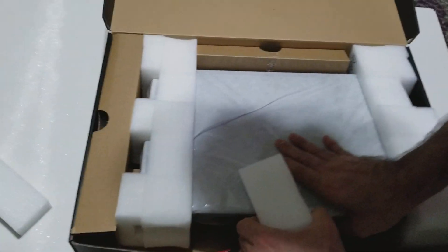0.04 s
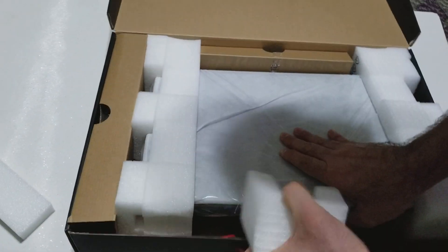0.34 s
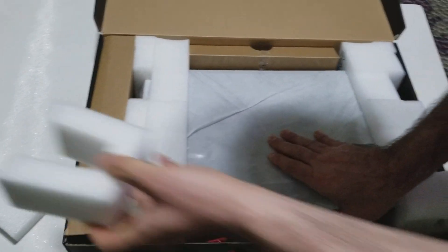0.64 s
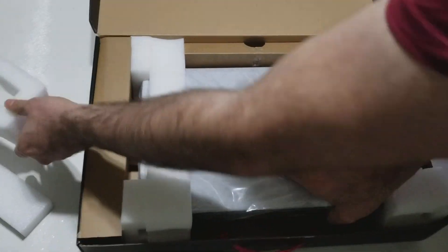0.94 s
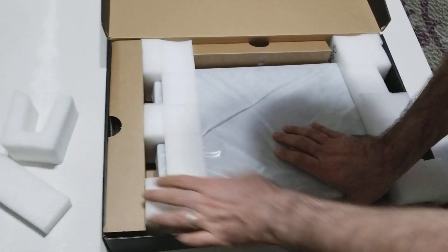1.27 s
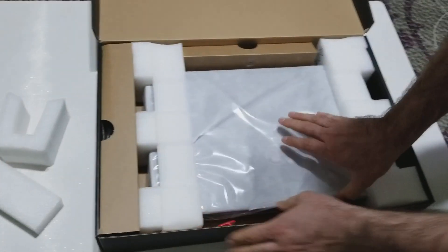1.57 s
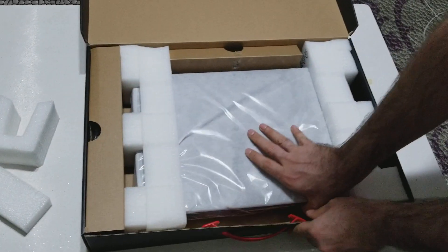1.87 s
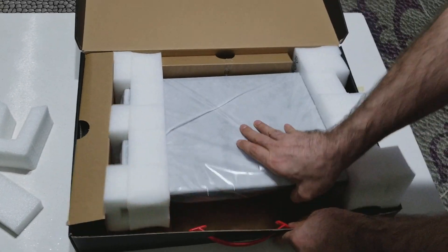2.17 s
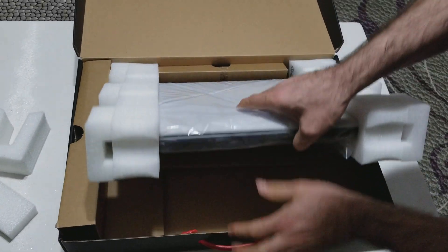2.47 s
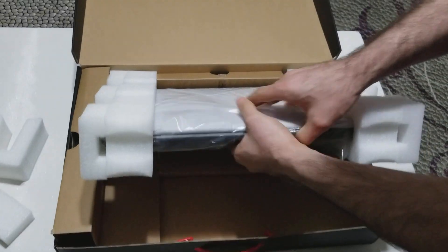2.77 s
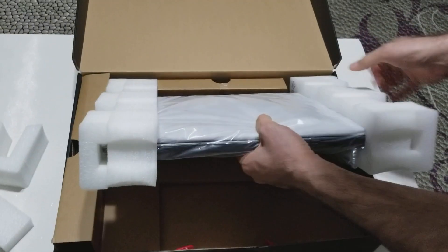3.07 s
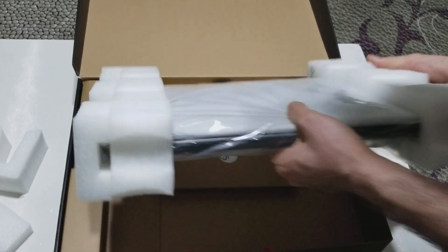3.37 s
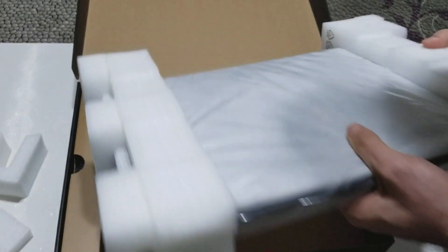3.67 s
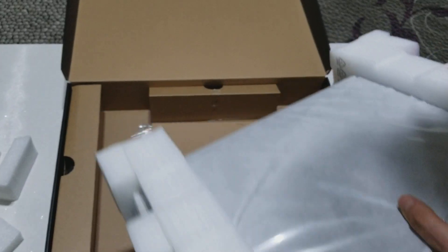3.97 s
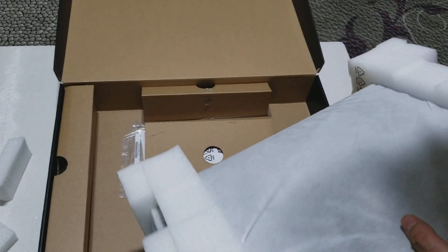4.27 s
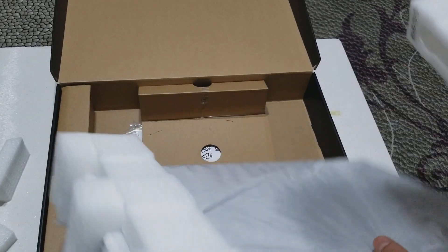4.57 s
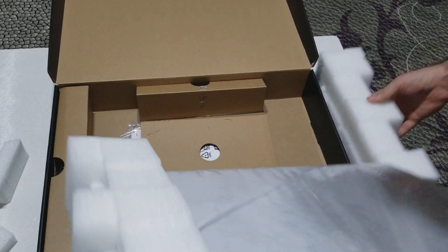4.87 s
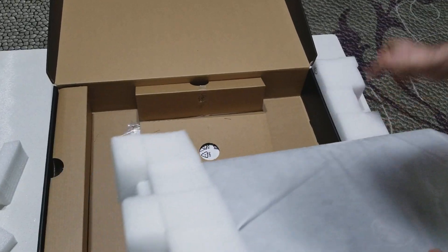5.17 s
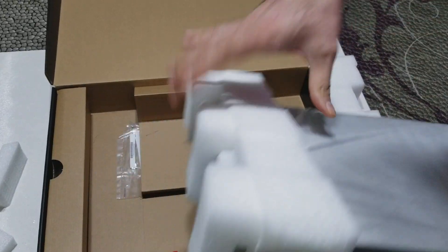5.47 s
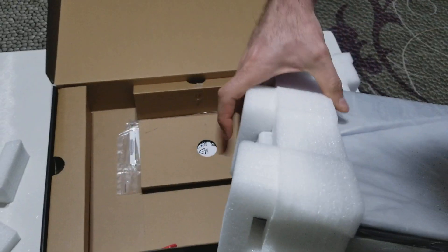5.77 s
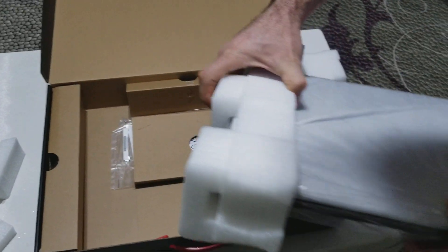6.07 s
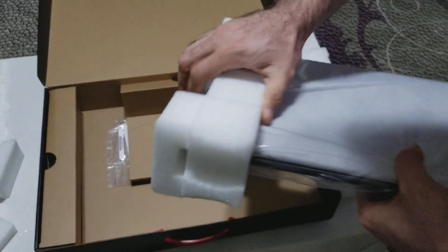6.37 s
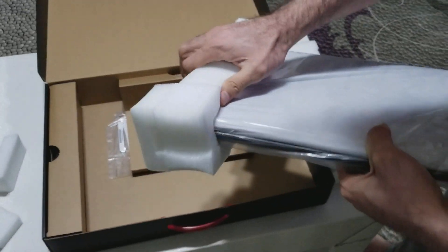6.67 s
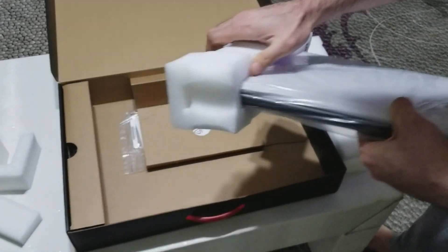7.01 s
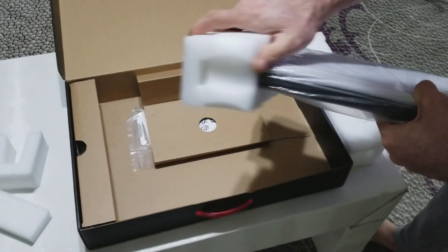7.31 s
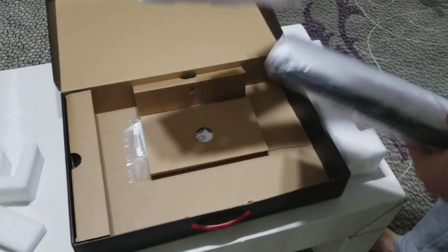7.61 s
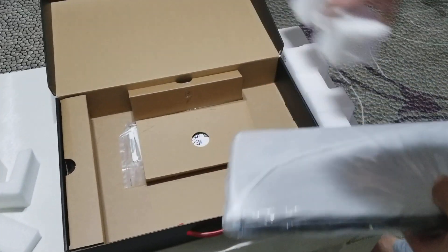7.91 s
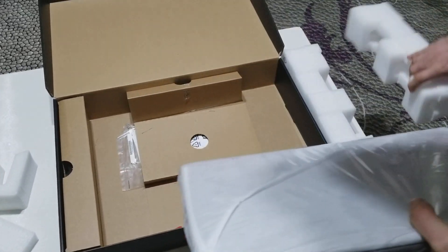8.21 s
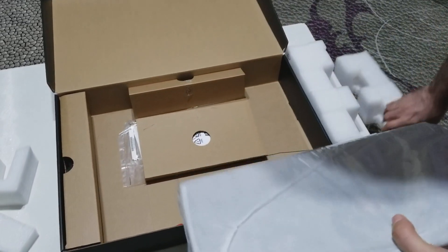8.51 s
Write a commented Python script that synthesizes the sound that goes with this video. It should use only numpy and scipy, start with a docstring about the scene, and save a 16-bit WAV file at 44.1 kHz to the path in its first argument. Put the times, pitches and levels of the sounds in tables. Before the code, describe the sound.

Foam packing rubs and rasps against a cardboard box while thin plastic wrap crinkles, with a few dull knocks.

```python
"""Foam rasps and thin plastic snaps: a sleeved laptop is lifted out of a cardboard box in a small room,
and its foam end caps are pulled off. Foam rubs on card and film in countless tiny slips, jerks free
and chafes with a hollow note. The sleeve crinkles as its creases buckle. The box drones under the
rubbing and thuds when knocked. Faint room noise and a low hum lie underneath."""
import sys
import numpy as np
from scipy import signal
from scipy.fft import rfft, irfft, next_fast_len
from scipy.io import wavfile
from scipy.ndimage import map_coordinates

SR = 44100
rng = np.random.default_rng(int(sys.argv[2]) if len(sys.argv) > 2 else 0)


def log_audio(samples):
    """Write samples as a 16-bit WAV file to the path given in sys.argv[1]."""
    # one column per channel
    frames = np.atleast_2d(samples).T
    # limit to full scale, then quantise
    limited = np.clip(frames, -1, 1)
    pcm = np.round(limited * 32767).astype(np.int16)
    wavfile.write(sys.argv[1], SR, pcm)


N = 381463
TIME_S = np.arange(N) / SR

# Foam strokes over card and film. Each row: start, build-up and slide in seconds, top rasp level in dB,
# then scrape, fizz and box drone in dB relative to the rasp.
STROKES = [(0.0, 0.005, 0.05, -44, -8, -18.5, -2.5), (0.091, 0.037, 0.086, -42, -7, -15, -9.5),
           (0.176, 0.018, 0.062, -38.0, -7, -8.0, -7.0), (0.292, 0.057, 0.0262, -35.5, -6.5, -7, -6.5),
           (0.505, 0.04, 0.0166, -48.5, -24, -5, -23.5), (0.822, 0.016, 0.015, -60, -19, -1, -16),
           (1.044, 0.0074, 0.032, -53.5, -10.5, -11, -1.5), (1.25, 0.047, 0.037, -54.5, 0, -13, 1.5),
           (1.298, 0.1081, 0.0214, -40.5, -3.5, -4.5, -8), (1.42, 0.032, 0.177, -51.5, -5.0, -13.5, -1.5),
           (1.693, 0.0545, 0.021, -53.5, -2, -26.5, 1.5), (1.812, 0.02, 0.084, -47.0, -2, -18, 1.0),
           (1.95, 0.072, 0.13, -46.5, -4.5, -1.5, -4.5), (2.132, 0.1545, 0.132, -39, -5, -8.0, -13.5),
           (2.399, 0.027, 0.1162, -47.5, 0.0, -15.5, 2.5), (2.679, 0.019, 0.095, -38.5, -8.5, -10.0, -9.5),
           (2.761, 0.0564, 0.0503, -38.0, -7, -17, -6.5), (2.976, 0.17, 0.055, -41, -4, -11.5, -12.5),
           (3.139, 0.12, 0.113, -37.8, -9.5, -8, -19), (3.513, 0.0243, 0.022, -57.5, -3.5, -7, 0),
           (3.733, 0.05, 0.094, -55.5, -7, -9, -8.5), (3.879, 0.055, 0.034, -51.5, -10, -11, -6.5),
           (4.059, 0.0497, 0.047, -49, -6.5, -7, -11.5), (4.196, 0.055, 0.125, -45.0, -11.5, -4, -11.5),
           (4.34, 0.031, 0.07, -37.5, -6, -1.5, -10), (4.454, 0.031, 0.072, -53.5, -4, -5.5, -5.5),
           (4.65, 0.1, 0.017, -46.5, -4.5, -9.5, -9.5), (4.943, 0.079, 0.026, -53, -3, -7.0, -4.0),
           (5.54, 0.025, 0.055, -40.5, -12.0, -9.5, -26), (5.672, 0.035, 0.018, -42, -10, -11.5, -21),
           (5.733, 0.035, 0.01, -41.5, -7.5, -11, -11), (5.815, 0.023, 0.047, -54, -8, -9, 0.5),
           (5.897, 0.018, 0.038, -45, -7.0, -9.5, -12.5), (6.168, 0.036, 0.038, -38.5, -11.5, -9, -19.5),
           (6.253, 0.055, 0.04, -38.0, -10.5, -8.5, -29), (6.422, 0.086, 0.1, -50.0, -5.5, -9.5, -8),
           (6.675, 0.031, 0.094, -60.5, -12.5, -7.0, -28), (6.991, 0.028, 0.026, -54, -2, -9.5, -18.5),
           (7.061, 0.089, 0.036, -44.0, -2.5, -14.5, -14), (7.141, 0.0599, 0.0321, -40.5, -5, -7.0, -17),
           (7.253, 0.055, 0.057, -51.5, -2, -4.5, -7), (7.339, 0.0464, 0.029, -38.0, -8.5, -6, -12.5),
           (7.424, 0.061, 0.13, -51.0, -4, -1.5, -19), (7.69, 0.091, 0.042, -59.5, -8, -9.0, -24),
           (7.928, 0.036, 0.0774, -65.0, -1.5, -5.5, -7.0), (8.467, 0.044, 0.075, -69.5, 0, -7, -2.5)]
# Light brushing as the load is carried. Each row: time in seconds, rasp level in dB.
HANDLING = [(0.0, -42.5), (0.4, -67), (0.75, -77), (0.99, -67.0), (1.24, -73), (1.54, -57.5), (2.58, -64.5),
            (2.96, -50), (3.62, -65), (4.03, -70.0), (4.6, -59.0), (5.27, -73.5), (5.43, -89), (5.95, -60),
            (6.83, -66), (7.55, -56.5), (8.15, -84.5), (8.65, -76.5)]
# Position of the rubbing. Each row: time in seconds, left over right in dB.
RUB_PAN = [(0, -1.5), (.6, -1.5), (1.35, -1), (1.8, -1), (2.3, -0.5), (2.8, -1), (3.3, 0), (3.9, -2),
           (4.4, -3), (5, -2), (6.3, 0.5), (7.3, -1), (8, -2), (8.65, -6.5)]
# Foam friction. Each row: frequency in Hz, relative density in dB.
FOAM_SPECTRUM = [(240, -25), (400, 0), (446, 1.5), (607, 3), (852, 1.5), (1090, 0), (2320, -7.5),
                 (2630, -5), (3210, -5.5), (5350, -6), (7870, -13), (8760, -17.5), (12500, -10),
                 (15000, -17), (16000, -28.5)]
# Shaken cardboard. Each row: frequency in Hz, relative density in dB.
CARD_SPECTRUM = [(90, -19), (122, -13.5), (144, -0.5), (165, -6.5), (200, -4), (255, -1.5), (320, -1),
                 (390, -3), (470, -7), (600, -9), (800, -38.5)]
# Room noise. Each row: frequency in Hz, relative density in dB.
AIR_SPECTRUM = [(15, -35.5), (25, -16.5), (53, -4.5), (74, -6.5), (102, -0.5), (127, -5), (249, -23),
                (560, -28), (796, -23.5), (1230, -35.5), (1370, -28), (1700, -32.5), (16000, -32.5)]
# Room hum. Each row: frequency in Hz, rms level in dB.
HUM_TONES = [(49, -88.5), (100, -83)]
# Big sleeve creases. Each row: time in seconds, level in dB, ring in Hz, left over right in dB.
BIG_CREASES = [(0.0196, -23, 3900, 2), (0.0286, -27.5, 3763, 8), (0.0358, -23.5, 4640, 2),
               (0.3, -32, 3740, -3), (0.364, -15, 7500, -2), (0.4472, -48, 7600, 5), (1.0564, -41, 7530, 6),
               (1.2539, -44, 5680, -2), (1.3166, -33, 4520, 2.5), (1.4432, -27, 5640, -3.5),
               (1.4996, -33.5, 4030, -2.5), (1.5358, -23, 3770, 1.5), (1.582, -27.5, 4420, -2.5),
               (1.589, -30, 4600, -10), (1.609, -26, 4460, -3), (1.7343, -39, 3900, -3),
               (1.8165, -24, 4640, -1.5), (1.8368, -26.5, 3100, 1), (1.9242, -31.5, 6530, 1.5),
               (2.0067, -28.5, 4980, -2.5), (2.0456, -22.5, 5600, -1.5), (2.1148, -28, 5140, -3.5),
               (2.6157, -33.5, 3900, -1.5), (2.662, -32, 4600, -5), (2.6941, -19.5, 4500, -1),
               (2.856, -17, 4530, 0.5), (2.871, -21, 5040, 0.5), (2.921, -22.5, 4746, -2),
               (3.707, -36.5, 4800, -7.5), (3.7408, -19, 5480, -4), (3.8422, -25.5, 3830, -4.5),
               (3.8939, -25, 5300, -5), (3.9258, -29.5, 5080, -2.5), (4.0652, -25.5, 4650, -8),
               (4.0775, -31, 6140, -5), (4.278, -27, 10800, -7.5), (4.4864, -27.5, 5000, -4),
               (4.5517, -29.5, 6190, -3), (4.6904, -28.5, 5530, 2), (4.7517, -28.5, 4530, -4.5),
               (4.9343, -41, 6020, -3), (5.0556, -33, 5100, -3), (5.1875, -44.5, 3800, -3),
               (5.2498, -43, 3600, -2.5), (5.8332, -27, 5490, -3), (6.127, -26.5, 3970, -8.5),
               (6.1437, -26.5, 4300, -3), (6.178, -29.5, 4840, -10), (6.491, -26, 7220, 2.5),
               (6.4965, -21.5, 3970, -4), (6.511, -26, 5270, -3), (6.519, -31.5, 3970, 0),
               (6.537, -28, 5900, -1.5), (6.6068, -37, 4860, 4.5), (6.7153, -27, 7700, 2.5),
               (6.7735, -30.5, 5170, -2.5), (6.875, -31, 6920, -3), (7.0057, -32.5, 4740, -2.5),
               (7.1062, -29.5, 3700, -2), (7.3853, -17, 3630, -3), (7.5142, -29.5, 4850, -2.5),
               (7.5794, -24.5, 5620, -3), (7.7722, -29, 5970, -2.5), (7.8945, -37.5, 5700, -7.5),
               (7.944, -31, 5240, -6.5), (8.0393, -36.5, 4950, -8)]
# Blows on the box. Each row: time in seconds, level in dB, excitation centre in Hz, spread in octaves.
KNOCKS = [(0.196, -35.5, 298, 0.7), (0.341, -30.5, 292, 0.3), (0.362, -30, 260, 0.96),
          (1.052, -38, 185, .45), (1.079, -30, 185, 0.5), (1.258, -34.5, 183, 0.735),
          (1.287, -39, 178.5, 0.3), (1.42, -25.5, 500, 0.804), (1.424, -36, 70, 0.53),
          (1.437, -24, 150, 1.5), (1.463, -33.5, 330, 1.11), (1.581, -41.5, 307, 0.42),
          (1.828, -37, 304, 0.384), (2.111, -36.5, 313, 0.63), (2.433, -31, 237.5, 0.461),
          (2.749, -29, 248, 0.17), (2.810, -33, 372, 0.21), (2.842, -31, 271, 0.31),
          (3.155, -14, 473, 0.607), (3.180, -24, 386, 0.3), (3.384, -22.5, 260, 0.862),
          (3.401, -31.5, 152, 0.33), (4.385, -50, 88, .25), (4.96, -52, 200, 1.2), (5.016, -39, 97, 0.29),
          (5.018, -35, 280, .75), (6.922, -50, 213, 0.21), (7.377, -41, 105, 0.7), (7.557, -43.5, 800, .7),
          (8.545, -58.5, 150, 0.22)]
# Box resonances. Each row: frequency in Hz, relative level in dB, T60 in seconds.
BOX_MODES = [(68, -12.5, 0.11), (102, -17.5, 0.033), (144.2, -2, 0.46), (179.7, -4.5, 0.25),
             (235.6, -9.5, .25), (264, -1, 0.19), (319, -3.5, .1), (370.4, -5, 0.18), (391, -10, 0.25),
             (477.5, 0, 0.055), (604, 1.5, 0.064), (758, 7, 0.03), (890, -18.5, 0.029), (1063, -4, 0.12),
             (1400, -8, 0.049)]
# Short noisy bursts: foam jerking free, a burst of sleeve crinkle (1.858 s) and a light tap (7.558 s).
# Each row: peak time in seconds, level in dB, rise and fall in seconds, pitch in Hz.
BURSTS = [(0.363, -24, 0.0012, 0.003, 4570), (0.369, -30.5, 0.0017, 0.0027, 1100),
          (1.318, -33, 0.00066, 0.0015, 1900), (1.858, -39.5, 0.0072, 0.0055, 3600),
          (2.692, -41, 0.0017, 0.0043, 4300), (4.355, -28, 0.00061, 0.0056, 5640),
          (4.364, -31, 0.0027, 0.0057, 2240), (5.908, -36.5, 0.00058, 0.00607, 2800),
          (5.912, -29.5, 0.00161, 0.0048, 3200), (7.38, -37, 0.0077, 0.0044, 1250),
          (7.382, -31, 0.0078, 0.0034, 3600), (7.558, -38, .0006, 0.0035, 1000)]
# Hollow foam chafes. Each row: peak time in seconds, level in dB, swell sigma in seconds, pitch in Hz.
CHAFES = [(0.546, -60, 0.021, 1412), (0.648, -64, .008, 1600), (0.985, -69.5, 0.042, 467),
          (4.106, -55.5, 0.0057, 1560), (4.389, -39, 0.01, 335), (4.707, -55, 0.0102, 973),
          (4.798, -54, 0.007, 1205), (6.206, -45.5, 0.0129, 1137), (7.033, -57.5, 0.0076, 726),
          (7.115, -49.5, .005, 520), (7.174, -49.5, 0.0055, 700), (7.274, -46.5, 0.0049, 695),
          (7.376, -38, 0.0141, 1640), (8.447, -68.5, 0.03, 620), (8.521, -58.5, 0.015, 627),
          (8.561, -65.5, 0.02, 929)]
# Sleeve flexes. Each row: start in seconds, length in seconds, mean snap level in dB.
FLEXES = [(1.487, .15, -35.5), (1.83, .3, -34.5), (3.552, .11, -46), (3.76, .08, -42), (3.921, .07, -38),
          (4.08, .05, -35), (4.499, .25, -39.5), (6.52, .14, -34), (7.02, .08, -37.5), (7.583, .17, -45)]
# Reverberation. Each row: frequency in Hz, T60 in seconds.
ROOM_T60 = [(150, 0.34), (1000, 0.35), (5000, 0.13), (15000, 0.14)]


def from_db(db):
    return 10 ** (np.asarray(db) / 20)


def unit_rms(x):
    return x / np.sqrt(np.mean(x ** 2) + 1e-20)


def over_time(points):
    """Read a curve at every sample."""
    return np.interp(TIME_S, *np.transpose(points))


def at_hz(points, hz):
    """Read a curve on a log-frequency axis."""
    points_hz, values = np.transpose(points)
    return np.interp(np.log(hz), np.log(points_hz), values)


def coloured(x, spectrum):
    """Give noise a spectrum; rms 1."""
    size = next_fast_len(N)
    hz = np.maximum(np.arange(size // 2 + 1) * SR / size, 1)
    return unit_rms(irfft(rfft(x, size) * from_db(at_hz(spectrum, hz)), size)[..., :N])


def band(x, low_hz, high_hz, order=2):
    sos = signal.butter(order, [low_hz, min(high_hz, 0.45 * SR)], "band", fs=SR, output="sos")
    return signal.sosfilt(sos, x + 1e-18)


def wobble(per_s):
    """Random wander through per_s points a second; spread near 1."""
    return np.interp(TIME_S * per_s, np.arange(N // 8), rng.standard_normal(N // 8))


def add(out, start_s, sound):
    start = max(round(start_s * SR), 0)
    out[..., start:start + sound.shape[-1]] += sound[..., :N - start]


def panned(x, pan_db):
    """Left louder than right by pan_db."""
    return x * from_db(np.array([[0.5], [-0.5]]) * pan_db)


def placed(x, pan_db, lag_s_per_db=0.00002):
    """An off-centre source is louder and earlier on its own side."""
    leads = np.array([0.5, -0.5]) * pan_db * lag_s_per_db * SR
    shifted = [map_coordinates(side, [np.arange(len(side)) + lead]) for side, lead in zip(x, leads)]
    return panned(np.array(shifted), pan_db)


def mid_side(noises, width):
    """Two noises as middle and side of a wide source."""
    return noises[0] + width * noises[1] * np.array([[1], [-1]])


def wide_treble(noises, width):
    """Stereo noise whose long waves reach both sides alike."""
    return mid_side([noises[0], band(noises[1], 900, 19000, order=1)], width)


def slips(grain_db, chatter_db, chatter_per_s):
    """Foam cells catch and let go: dense, uneven ticks, clumped by stick and slip."""
    ticks = rng.standard_normal((2, N)) * from_db(grain_db * np.minimum(rng.exponential(1, N), 5))
    return ticks * from_db(chatter_db * wobble(chatter_per_s))


def rubbing_levels_db(bite_s=0.0073, build_db=7.5, ease_db=3.2, release_db_per_s=289):
    """Strokes bite, build, ease and die away over light handling. Gives rasp, scrape, fizz, drone."""
    handling_mix_db = np.array([[0], [-5.5], [-9.5], [-6]])
    power = from_db(over_time(HANDLING) + handling_mix_db) ** 2
    t = TIME_S[:SR]
    for start_s, build_s, slide_s, top_db, *mix_db in STROKES:
        turns_s = np.cumsum([0, build_s, slide_s])
        shape_db = np.interp(t, turns_s, [-build_db, 0, -ease_db])
        shape_db -= release_db_per_s * np.maximum(t - turns_s[-1], 0)
        stroke = from_db(top_db + shape_db) * np.minimum(t / bite_s, 1)
        add(power, start_s, np.outer(from_db([0, *mix_db]), stroke) ** 2)
    return 10 * np.log10(power)


def lightness(rasp_db, firm_db=-44, light_db=-54):
    """0 while foam is pressed and slides, 1 while the loose sleeve is only handled."""
    return np.clip((rasp_db - firm_db) / (light_db - firm_db), 0, 1)


def foam_rub(friction, rasp_db, scrape_db, fizz_db):
    """Broad contact scrapes, edges rasp, single cells fizz; all follow one uneven pull."""
    scrape = from_db(scrape_db) * unit_rms(mid_side(band(friction, 550, 1700, order=3), 0.45))
    rasp = from_db(rasp_db + 2.1) * unit_rms(mid_side(band(friction, 2040, 7900, order=4), 0.96))
    fizz = from_db(fizz_db + 1.06) * unit_rms(mid_side(band(friction, 8000, 19000, order=4), 1))
    light = lightness(rasp_db)
    pull = from_db((0.7 + 1.2 * light) * wobble(per_s=110) - 1.8 * light)
    return (panned(scrape + fizz, pan_db=3) + panned(rasp, pan_db=-0.5)) * pull


def panel_reflection(x, strength=0.38, delay_s=0.0007):
    """A nearby panel mirrors the rubbing; the comb slides as the hands move."""
    lags = [(delay_s * SR * np.exp(0.3 * wobble(per_s=5))).astype(int) for side in x]
    mirrored = np.array([side[np.maximum(np.arange(N) - lag, 0)] for side, lag in zip(x, lags)])
    return (x + strength * mirrored) / np.hypot(1, strength)


def box_drone(drone_db, rasp_db):
    """Stick and slip shakes the cardboard panels."""
    panels = coloured(slips(grain_db=1, chatter_db=4, chatter_per_s=150), CARD_SPECTRUM)
    gain = from_db(drone_db + 0.55 - 0.93 * lightness(rasp_db))
    return gain * unit_rms(mid_side(panels, width=0.23))


def room_tone(air_db=-71):
    """Faint noise, wide in the treble, with a low hum."""
    mid, side = coloured(rng.standard_normal((2, N)), AIR_SPECTRUM)
    side = 0.2 * side + band(side, 600, 17000, order=1)
    hum = sum(np.sqrt(2) * from_db(db) * np.sin(2 * np.pi * hz * TIME_S) for hz, db in HUM_TONES)
    return from_db(air_db) * mid_side([mid, side], width=1) + hum


def sleeve_crinkle(rasp_db, median_per_s=110, spread_db=5.5):
    """Tiny creases give way in clusters; each clicks in one of four bands."""
    rate_per_s = median_per_s * from_db(5 * wobble(per_s=16))
    onsets = np.flatnonzero(rng.random(N) < rate_per_s / SR)
    count = len(onsets)
    size_db = spread_db * np.minimum(rng.exponential(1, count), 3)
    gains = from_db(np.minimum(rasp_db[onsets], -46) + 15 + size_db)
    clicks = np.zeros((4, 2, N))
    clicks[rng.integers(0, 4, count), :, onsets] = panned(gains, pan_db=rng.normal(-8.5, 7.6, count)).T
    bands_hz = np.geomspace(3300, 7000, 4)
    return sum(band(train, hz / 0.9, hz * 1.117, order=1) for train, hz in zip(clicks, bands_hz))


def sleeve_snaps(creases, ring_s=0.00045, crack_s=0.000078, flutter_s=0.0013):
    """A buckling crease rings in two partials and cracks more with force; the film then flutters."""
    out, t = np.zeros((2, N)), TIME_S[:SR // 50]
    hisses = band(rng.standard_normal((len(creases), 3, len(t))), 4700, 13000)
    for (start_s, level_db, hz, pan_db), hiss in zip(creases, hisses):
        overtone_ratio, slack = rng.uniform(1.3, 1.9), rng.uniform(0.7, 1.3)
        phase = 2 * np.pi * hz * t
        ring = (np.sin(phase) + 0.36 * np.sin(overtone_ratio * phase)) * np.exp(-t / (ring_s * slack))
        crack = 0.42 * (hiss[2] + 0.59 * hiss[:2]) * np.exp(-t / crack_s)
        flutter = 0.22 * hiss[:2] * np.exp(-t / flutter_s)
        force = from_db(0.26 * (level_db + 24))
        snap = band(ring + force * (crack + flutter), 2800, 15000, order=3)
        snap = placed(np.pad(snap, [(0, 0), (SR // 1000, 0)]), pan_db)  # 1 ms for the earlier side
        peak = np.sqrt(np.mean(np.abs(snap).max(1) ** 2))
        add(out, start_s - 0.001, from_db(level_db + 3.5) * snap / peak)
    return out


def box_knocks(contact_s=0.0029, rattle_s=0.026):
    """Soft blows ring the low box modes, hard blows the high ones; loose flaps rattle after."""
    out, t = np.zeros((2, N)), TIME_S[:SR // 2]
    hz, mode_db, t60_s = np.transpose(BOX_MODES)[:, :, None]
    polarity = (-1) ** (np.arange(len(BOX_MODES))[:, None] // 2)
    modes = polarity * from_db(mode_db - 60 * t / t60_s) * np.sin(2 * np.pi * hz * t)
    for start_s, level_db, centre_hz, spread_oct in KNOCKS:
        excitation = np.exp(-0.5 * (np.log2(hz / centre_hz) / spread_oct) ** 2)
        body = (modes * excitation).sum(0)
        noise = mid_side(rng.standard_normal((2, len(t))), width=0.34)
        flaps = unit_rms(band(noise, centre_hz / 2 ** spread_oct, centre_hz * 2 ** spread_oct))
        blow = body / np.abs(body).max() + 0.21 * flaps * np.exp(-t / rattle_s)
        add(out, start_s, from_db(level_db) * blow * (1 - np.exp(-t / contact_s)))
    return out


def noisy_bursts(friction):
    """Friction noise flares and dies in milliseconds: foam jerking free, a crinkle, a light tap."""
    out = np.zeros((2, N))
    for peak_s, level_db, rise_s, fall_s, hz in BURSTS:
        span = slice(max(round((peak_s - 0.1) * SR), 0), round((peak_s + 0.2) * SR))
        t = TIME_S[span] - peak_s
        noise = mid_side(friction[:, span], width=0.65)
        burst = unit_rms(band(noise, hz / 1.58, hz * 2.266) + 0.4 * band(noise, hz, 16000, order=1))
        envelope = np.exp(-np.maximum(-t / rise_s, t / fall_s))
        out[:, span] += from_db(level_db + 3.5) * burst * envelope
    return out


def foam_chafes(friction, edge_ratio=1.146, skirt=0.086):
    """Slips excite one narrow resonance of a foam block, under a smooth swell."""
    out = np.zeros((2, N))
    for peak_s, level_db, sigma_s, hz in CHAFES:
        span = slice(round((peak_s - 0.15) * SR), round((peak_s + 0.15) * SR))
        swell = np.exp(-0.5 * ((TIME_S[span] - peak_s) / sigma_s) ** 2)
        noise = mid_side(friction[:, span], width=0.35)
        hollow = band(noise, hz / edge_ratio, hz * edge_ratio) + skirt * band(noise, hz / 2, hz * 2)
        out[:, span] += from_db(level_db) * unit_rms(swell * hollow) * np.sqrt(np.mean(swell ** 2))
    return out


def flex_creases(snaps_per_s=42, spread_db=3.5, ring_hz=4750, spread_oct=0.303):
    """Each flex buckles a run of small creases at uneven moments; rows as in BIG_CREASES."""
    creases = []
    for start_s, length_s, level_db in FLEXES:
        delays_s = (np.arange(16) + rng.random(16)) / snaps_per_s
        for delay_s in delays_s[delays_s < length_s]:
            hz = ring_hz * 2 ** rng.normal(0, spread_oct)
            pan_db = rng.normal(-4, 2.5)
            creases.append((start_s + delay_s, rng.normal(level_db, spread_db), hz, pan_db))
    return creases


def room(x, early_db, tail_db, early_decay_s=0.0041):
    """Quick reflections off box and table, then a diffuse tail that dies band by band."""
    t, edges_hz = TIME_S[:SR // 2], np.geomspace(90, 18000, 9)
    early_noise, tail_noise = [wide_treble(n, width=0.98) for n in rng.standard_normal((2, 2, len(t)))]
    early = unit_rms(early_noise * np.exp(-t / early_decay_s) * (t > 0.0015))
    tail = np.zeros_like(early)
    for low_hz, high_hz in zip(edges_hz, edges_hz[1:]):
        t60_s = at_hz(ROOM_T60, np.sqrt(low_hz * high_hz))
        tail += band(tail_noise, low_hz, high_hz) * from_db(-60 * t / t60_s) * (t > 0.006)
    response = (from_db(early_db) * early + from_db(tail_db) * unit_rms(tail)) / np.sqrt(len(t))
    return x + signal.oaconvolve(x, response, axes=1)[:, :N]


def scene():
    """Foam, box and sleeve in one room."""
    rasp_db, scrape_db, fizz_db, drone_db = rubbing_levels_db()
    friction = coloured(slips(grain_db=2, chatter_db=2.5, chatter_per_s=450), FOAM_SPECTRUM)
    handling = foam_rub(friction, rasp_db, scrape_db, fizz_db) + noisy_bursts(friction)
    handling = panned(panel_reflection(handling), over_time(RUB_PAN))
    handling = room(handling + foam_chafes(friction), early_db=-11.5, tail_db=-15)
    box = room(box_drone(drone_db, rasp_db) + box_knocks(), early_db=-16, tail_db=-14)
    air = room_tone()
    crackle = sleeve_crinkle(rasp_db) + sleeve_snaps(list(BIG_CREASES) + flex_creases())
    sleeve = room(crackle, early_db=-8.5, tail_db=-12)
    return handling + box + air + sleeve


def record(dry):
    """Steep low-pass at 16.1 kHz."""
    return signal.sosfilt(signal.ellip(10, 0.2, 70, 16100, fs=SR, output="sos"), dry)


dry = scene()
out = record(dry)
log_audio(out)
```